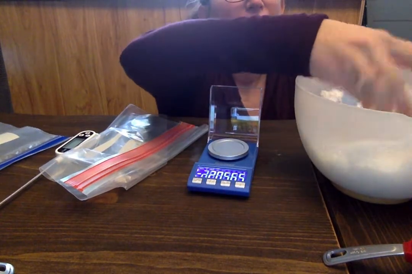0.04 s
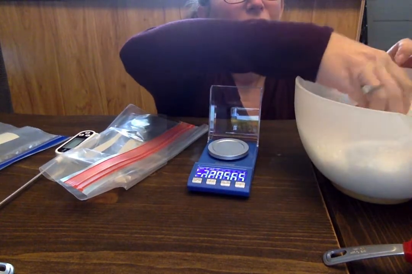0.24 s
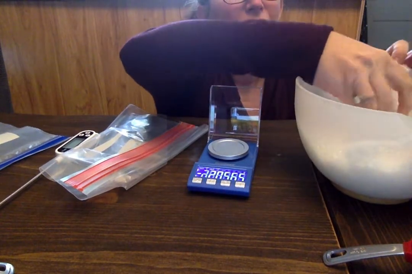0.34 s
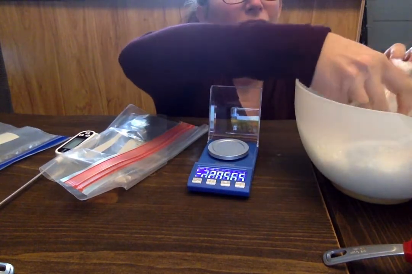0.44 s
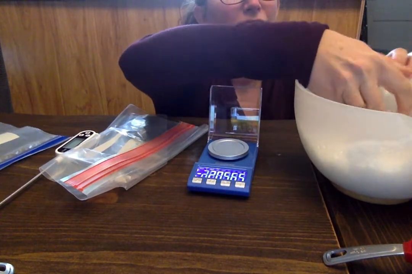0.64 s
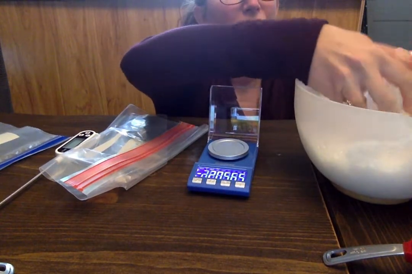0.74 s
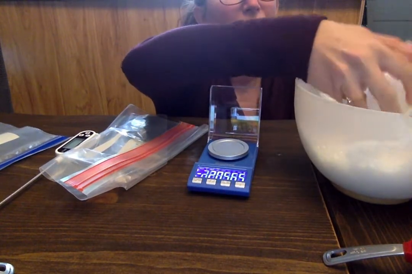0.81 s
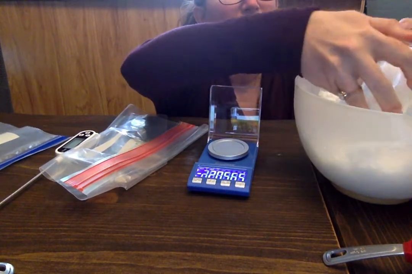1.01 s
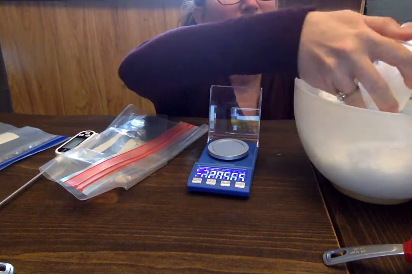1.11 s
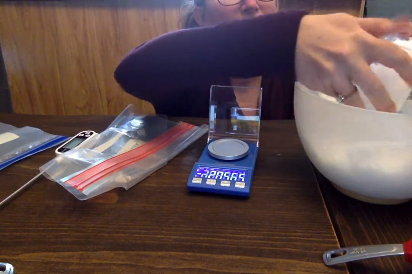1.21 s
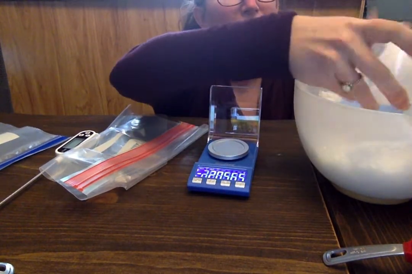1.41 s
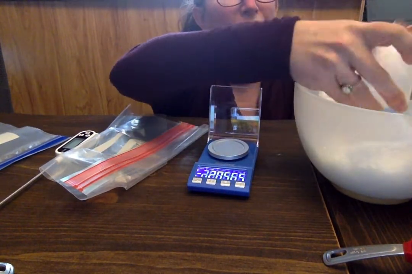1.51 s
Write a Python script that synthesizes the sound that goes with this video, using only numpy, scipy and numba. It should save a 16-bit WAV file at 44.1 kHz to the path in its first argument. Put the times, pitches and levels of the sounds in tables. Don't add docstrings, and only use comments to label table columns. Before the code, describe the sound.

Snow crunching in a plastic bowl, close-miked in a quiet room with faint hum. A tiny tick at 0.08 s, then from 0.2 s a beaker drives in: a dense, bright crackle with hollow thuds, loudest and distorted around 0.24 s, easing by 0.45 s. Sparse cracks follow from 0.55 to 1.0 s, soft bowl knocks near 1.03 s, faint grains, and a faint stuttering rim rub from 1.53 s.

```python
import sys
import numpy as np
from scipy import signal
from scipy.fft import rfft, irfft
from scipy.io import wavfile
from scipy.ndimage import uniform_filter1d
from numba import njit

SR = 44100
rng = np.random.default_rng(int(sys.argv[2]) if len(sys.argv) > 2 else 0)


def wav_record(signal):
    frames = np.transpose(np.atleast_2d(signal))
    bounded = np.clip(frames, -1, 1)
    quanta = np.round(bounded * 32767).astype(np.int16)
    wavfile.write(sys.argv[1], SR, quanta)


def linear_from_db(decibels):
    return 10 ** (np.asarray(decibels, float) / 20)


N = 68355

# freq_hz, density_db
ROOM_TONE = [(18, -55.5), (30, -23.5), (355, -6), (437, -14), (632, -11.5), (1590, -23), (1760, -25.5),
             (11700, -31.5), (16000, -28.5)]
# pitch_hz, level_db
APPLIANCE_HUM = [(182, -77), (352, -77), (643, -76)]
# centre_hz, width_hz, level_db
RIM_RESONANCES = [(1200, 32, 2.5), (1725, 143, 1), (2390, 93, 2.5), (4586, 86, -1), (8010, 113, -7.5),
                  (9000, 34, -4)]
# start_s,
# length_s, level_db, centre_hz, width_hz
HISS_SWELLS = [(1.33, .07, -67, 9200, 900), (1.33, .05, -70, 11300, 700), (1.34, .05, -69, 12700, 900),
               (1.49, .06, -68, 9000, 1500), (1.29, .02, -72, 8400, 600), (1.04, .035, -60, 15300, 1500),
               (1.04, .012, -58, 4150, 500), (.563, .014, -39, 4200, 2500), (.565, .012, -42, 8500, 3000),
               (.565, .012, -44, 12500, 4000), (.706, .005, -46, 8000, 5000),
               (.554, .008, -52, 11700, 900), (.95, .09, -54, 4500, 700), (.88, .11, -56, 2400, 400),
               (.29, .08, -36, 1100, 150), (.2, .18, -39, 10000, 1200), (.2, .18, -39, 14500, 2000),
               (.078, .04, -65, 4500, 1200), (.0795, .005, -47, 4600, 1200), (1.52, .06, -68, 5500, 1500),
               (.32, .09, -40, 3500, 700), (.2, .18, -40, 5800, 1800)]
# peak_s, peak_db, pitch_hz, ring_t60_s
BOWL_KNOCKS = [(.213, -27, 315, 0.018), (.244, -16, 340, 0.028), (.245, -20.5, 60.65, 0.025),
               (.242, -23.5, 175, .04), (.28, -28.5, 260, 0.028), (.31, -55, 57, 0.028),
               (.58, -32, 373, 0.015), (.629, -37, 1600, 0.0095), (.629, -37, 636, 0.02),
               (1.1, -42, 490, 0.011), (0.84, -40, 870, 0.026), (.571, -29, 1147, 0.017),
               (.234, -18, 1800, 0.018), (.247, -19, 1650, 0.012), (.232, -16, 1270, 0.035),
               (1.023, -40, 601, 0.031), (1.030, -31, 720, 0.014), (1.028, -33.5, 395.6, 0.083),
               (1.04, -39.5, 169.4, 0.052), (1.045, -44, 393, 0.034), (1.068, -39.5, 301, 0.063),
               (1.071, -52, 800, 0.02)]
# peak_s, peak_db, pitch_hz, ring_t60_s
LUMP_THUDS = [(0.1977, -26.5, 670.0, 0.023), (0.2012, -23.0, 580.0, 0.021), (0.2053, -18.0, 882, 0.016),
              (0.2078, -19.5, 883, 0.022), (0.2138, -8.0, 876, 0.02), (0.2196, -14, 700.0, 0.022),
              (0.2283, -9.5, 936, 0.0082), (0.2344, -5.5, 648, 0.024), (0.2447, -1.5, 541, 0.016),
              (0.2611, -25, 557, 0.029), (0.2697, -20.0, 547, 0.012), (0.2788, -27.5, 467, 0.019),
              (0.2894, -25, 480.0, 0.02), (0.2994, -19, 690, 0.01), (0.3078, -12.5, 620.0, 0.0099),
              (0.3161, -15.5, 582, 0.025), (0.3462, -17.0, 590.0, 0.017), (0.3618, -19.5, 707, 0.011),
              (0.3682, -19.0, 687, 0.015), (0.3803, -26.5, 692, 0.03), (0.4049, -28.5, 680.0, 0.011),
              (0.4162, -34.5, 830.0, 0.019), (0.4411, -45, 1110.0, 0.01), (0.449, -41, 750.0, 0.012),
              (0.4555, -39, 1010.0, 0.016), (0.4645, -37.5, 687, 0.02), (0.4749, -40, 596, 0.022),
              (0.4867, -30.0, 824, 0.0098), (0.4949, -33.0, 550.0, 0.016), (0.5139, -38, 890, 0.016),
              (0.5186, -35.5, 862, 0.025), (0.5719, -22.5, 710, 0.0077), (0.5806, -18.5, 672, 0.013),
              (0.6105, -44, 650.0, 0.011), (0.6264, -35, 1157, 0.026), (0.6437, -43.0, 650.0, 0.016),
              (0.7185, -39.5, 1130.0, 0.043), (0.7463, -33.5, 1070.0, 0.0093), (0.7537, -37, 1150.0, 0.016),
              (0.7659, -35.5, 685, 0.0064), (0.7729, -39.0, 990, 0.0086), (0.7809, -38, 1010, 0.01),
              (0.7926, -24.5, 1070, 0.01), (0.8077, -34.5, 846, 0.015), (0.8161, -34.0, 894, 0.0086),
              (0.8224, -32.0, 870.0, 0.013), (0.8516, -43.5, 894, 0.032), (0.8712, -38.5, 880.0, 0.016),
              (0.9068, -35.0, 790, 0.009), (0.9313, -47.5, 900.0, 0.012)]
# peak_s, peak_db, centre_hz, t60_s, broad_share_db
ICE_CRACKS = [(0.0827, -27.0, 4430, 0.0076, -1.0), (0.2067, -0.5, 12860, 0.0096, -0.5),
              (0.2085, -0.5, 3950, 0.011, 0.5), (0.2128, -1.0, 3600, 0.012, 1.5),
              (0.2274, -2.5, 3960.0, 0.03, -1.0), (0.2342, 5.5, 3500, 0.016, -2),
              (0.2418, 1.5, 4730, 0.022, -1.5), (0.247, -5, 4090.0, 0.011, -4),
              (0.2634, -12, 4910.0, 0.02, 0), (0.3086, -17, 3900, 0.027, -5),
              (0.3252, -16.5, 3660.0, 0.01, -9), (0.3325, -17.0, 3640.0, 0.012, -1.0),
              (0.3495, -13.5, 3870.0, 0.012, -8), (0.3551, -17.5, 3870.0, 0.0077, -3),
              (0.3618, -9.5, 3520.0, 0.012, -12), (0.384, -19, 12000, 0.0095, -6),
              (0.458, -16.5, 7770.0, 0.0058, 0), (0.4745, -30, 11190.0, 0.013, 1),
              (0.483, -26.5, 4460, 0.011, -2), (0.5447, -35, 4190.0, 0.009, -15),
              (0.5781, -15.5, 15400.0, 0.012, 1), (0.6293, -21.5, 4430, 0.012, 1),
              (0.668, -23.0, 11600, 0.0057, 1), (0.695, -32.5, 11640.0, 0.011, -4),
              (0.717, -28.5, 3740, 0.01, 3), (0.7266, -28, 13380.0, 0.0086, -3),
              (0.7342, -26.5, 11530.0, 0.006, -3), (0.7636, -30.5, 3900, 0.032, 4),
              (0.782, -24.5, 4340, 0.011, 2), (0.7885, -21.5, 13020.0, 0.011, -2),
              (0.8014, -22.5, 9080.0, 0.026, -6), (0.8155, -22.5, 7980.0, 0.018, -1.0),
              (0.8597, -26.5, 8100, 0.027, 1), (0.9054, -19, 8870.0, 0.0094, -4),
              (0.9547, -19.0, 8030, 0.0061, 1), (0.9933, -28.0, 4520.0, 0.008, -16),
              (1.0416, -29.5, 14900.0, 0.016, -7.5), (1.0911, -44, 9130, 0.023, -1.0),
              (1.1785, -47.0, 7820.0, 0.006, -1.0), (1.2624, -48.0, 8420.0, 0.02, -10)]
# centre_hz, width_hz, level_db
ICE_RESONANCES = [(1810, 900, -6.5), (2481, 1100, -11.5), (3765, 390, 3), (4587, 480, -2.5),
                  (7180, 900, -2), (8500, 1300, -2), (11500, 1300, 0), (12720, 710, -2.5), (14300, 600, -3),
                  (15500, 900, 1)]
# time_s, crackle_db, pocket_db, pocket_pitch_hz
BEAKER_PUSH = [(0.196, -42.5, -38, 800), (0.207, -19, -23, 785), (0.249, -24.5, -22, 565),
               (0.291, -38.5, -25.5, 575.6), (0.371, -33, -32, 623), (0.412, -41, -38, 684),
               (.44, -44, -43, 690), (0.528, -54.5, -46, 750), (0.547, -62, -49, 755),
               (0.588, -47.5, -42, 640), (0.688, -61, -56.5, 770), (0.717, -45.5, -52.5, 980),
               (.775, -60.5, -49.5, 1080), (.79, -39, -35, 957), (.895, -48.5, -63.5, 865),
               (0.904, -40.5, -46, 817), (0.994, -55.5, -95, 842), (1.06, -80.5, -110, 810)]


def unit(x):
    return x / np.sqrt(np.mean(x ** 2))


@njit
def moving_bandpass(x, hz, width_hz):
    y, band_state, low_state = np.empty(len(x)), 0., 0.
    for i in range(len(x)):
        g = np.tan(np.pi * hz[i] / SR)
        damping = width_hz / hz[i]
        v = (band_state + g * (x[i] - low_state)) / (1 + g * (g + damping))
        band_state = 2 * v - band_state
        low_state = low_state + 2 * g * v
        y[i] = damping * v
    return y


def band(x, hz, width_hz):
    return moving_bandpass(x, np.zeros(len(x)) + hz, float(width_hz))


def steep(x, hz, width_hz):
    return band(band(x, hz, width_hz), hz, width_hz)


def walk(rate_hz):
    hold = int(SR / rate_hz)
    steps = np.repeat(rng.standard_normal(N // hold + 1), hold)
    return unit(uniform_filter1d(steps, hold)[:N])


def resonate(x, resonances, patchy_db=0):
    out = np.zeros(len(x))
    for k, (hz, width_hz, db) in enumerate(resonances):
        if patchy_db:
            db = db + patchy_db * walk(25)
        out += (-1) ** k * linear_from_db(db) * steep(x, hz, 2.5 * width_hz)
    return out


def add(out, start_s, x):
    i = int(start_s * SR)
    out[i:i + len(x)] += x[:N - i]


def blow(rise_s, t60_s):
    t = np.arange(4096) / SR
    env = (1 - np.exp(-t / rise_s)) ** 2 * linear_from_db(-60 * t / t60_s)
    return t, env / env.max()


def ring_blows(table, rise_s, rough, spread):
    out = np.zeros(N)
    for peak_s, db, hz, t60_s in table:
        t, env = blow(rise_s, t60_s)
        noise = unit(steep(rng.standard_normal(len(t)), hz, spread * hz))
        tone = np.sin(2 * np.pi * hz * t) + rough * noise
        add(out, peak_s - rise_s, linear_from_db(db) * env * tone)
    return out


def room_tone():
    t = np.arange(N) / SR
    hz = np.fft.rfftfreq(N, 1 / SR) + 1
    freq_hz, density_db = np.array(ROOM_TONE).T
    colour = linear_from_db(np.interp(np.log(hz), np.log(freq_hz), density_db))
    air = unit(irfft(rfft(rng.standard_normal(N)) * colour, N)) * linear_from_db(-64 + 1.0 * walk(6))
    for pitch_hz, db in APPLIANCE_HUM:
        air += np.sqrt(2) * linear_from_db(db + 2 * walk(13)) * np.sin(2 * np.pi * pitch_hz * t)
    return air


def room_tail(x):
    t60_s, level_db = .22, -23
    t = np.arange(SR // 2) / SR
    tail = band(rng.standard_normal(len(t)), 3500, 8790) * linear_from_db(-60 * t / t60_s)
    tail = tail * (t > .003)
    return signal.fftconvolve(x, tail / np.sqrt(np.sum(tail ** 2)))[:N] * linear_from_db(level_db)


def rim_rub():
    start_s, rise_s, level_db, slip_hz = 1.536, .007, -47, 580
    t = np.arange(N) / SR
    phase = np.cumsum(slip_hz * (1 + 0.1 * walk(300))) / SR
    slips = np.diff(np.floor(phase), prepend=0) * linear_from_db(2.7 * walk(630))
    slips = slips + 0.1 * rng.standard_normal(N)
    swell = 1 / (1 + np.exp(-np.clip((t - start_s) / rise_s * 2, -50, 50)))
    return unit(resonate(slips, RIM_RESONANCES)) * linear_from_db(level_db) * swell


def hiss_swells():
    out = np.zeros(N)
    for start_s, length_s, db, hz, width_hz in HISS_SWELLS:
        n = int(length_s * SR)
        hiss = unit(steep(rng.standard_normal(8192), hz, width_hz))[:n]
        add(out, start_s, linear_from_db(db) * np.hanning(n) * hiss)
    return out


def bowl_knocks():
    return ring_blows(BOWL_KNOCKS, rise_s=.003, rough=0.42, spread=0.72)


def lump_thuds():
    return ring_blows(LUMP_THUDS, rise_s=.002, rough=0.32, spread=.9)


def ice_cracks():
    rise_s = .0008
    out = np.zeros(N)
    for peak_s, db, hz, t60_s, broad_db in ICE_CRACKS:
        t, env = blow(rise_s, t60_s)
        noise = rng.standard_normal(len(t))
        bright = unit(steep(noise, hz, 0.34 * hz))
        broad = linear_from_db(broad_db) * unit(resonate(noise, ICE_RESONANCES[2:]))
        crack = env * (bright + broad)
        add(out, peak_s - rise_s, linear_from_db(db - 6.0) * crack / np.abs(crack).max())
    return out


def breaking_grains(grains_per_s):
    scatter_db = 3.2
    chance = rng.random((3, N))
    breaks = chance[0] < grains_per_s / SR
    size = linear_from_db(-scatter_db * np.log(1 - .97 * chance[2]))
    return breaks * np.sign(chance[1] - .5) * size


def snow_crackle():
    flicker_db = 2.2
    t = np.arange(N) / SR
    time_s, crackle_db, pocket_db, pitch_hz = np.array(BEAKER_PUSH).T
    crackle_db = np.interp(t, time_s, crackle_db, left=-120, right=-120)
    pocket_db = np.interp(t, time_s, pocket_db, left=-120, right=-120)
    hz = np.interp(t, time_s, pitch_hz)

    ice = unit(resonate(breaking_grains(7000), ICE_RESONANCES, patchy_db=3))
    ice = ice * linear_from_db(crackle_db + flicker_db * walk(250))

    low = breaking_grains(3000)
    pocket = unit(band(low, hz, 220))
    pocket = pocket + linear_from_db(-12) * unit(band(low, 1.6 * hz, 200))
    pocket = pocket + linear_from_db(-2.5) * unit(steep(low, hz, 530))
    return ice + unit(pocket) * linear_from_db(pocket_db - 3 + flicker_db * walk(100))


def scene():
    near = rim_rub() + hiss_swells() + bowl_knocks() + lump_thuds() + ice_cracks() + snow_crackle()
    return (room_tone() + room_tail(near) + near)[None]


def low_pass(x):
    return signal.sosfilt(signal.butter(12, 16970, fs=SR, output="sos"), x)


def record(dry):
    ceiling = .76
    bass_cut = signal.butter(1, 70, "high", fs=SR, output="sos")
    top_cut = signal.ellip(8, .5, 45, 16050, fs=SR, output="sos")
    driven = signal.sosfilt(bass_cut, dry) / ceiling
    flattened = driven / (1 + driven ** 4) ** .25
    mix = ceiling * signal.sosfilt(top_cut, flattened)
    return low_pass(mix)


dry = scene()
out = record(dry)
wav_record(out)
```